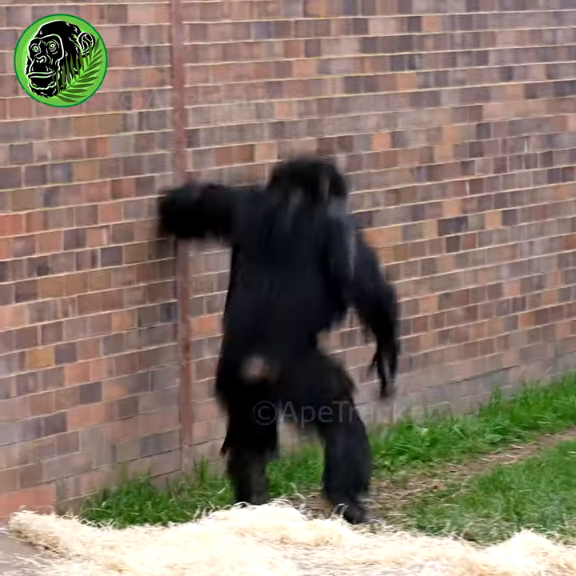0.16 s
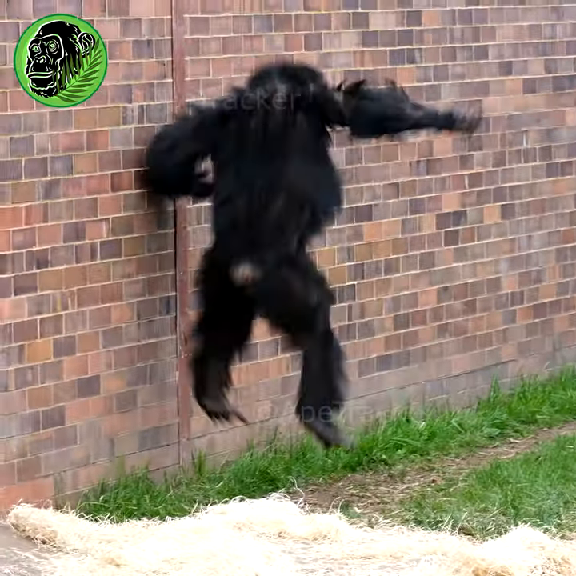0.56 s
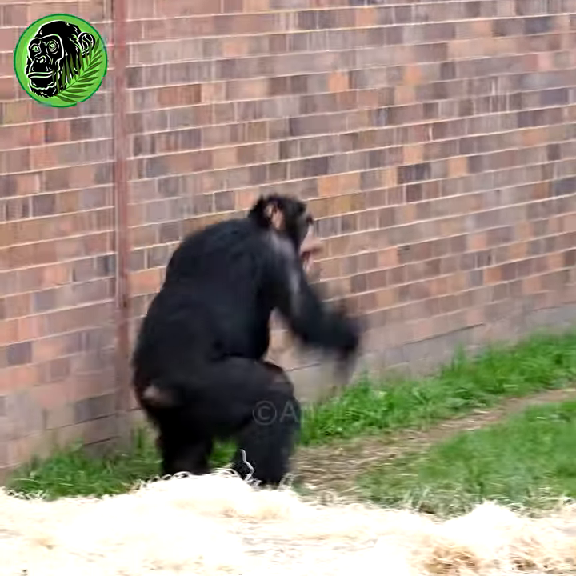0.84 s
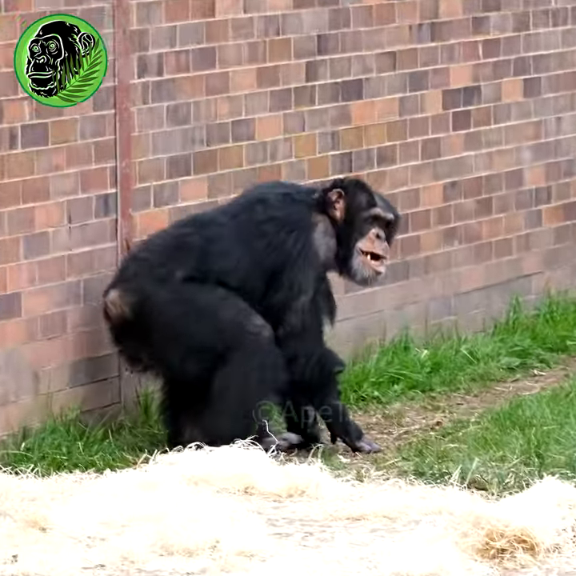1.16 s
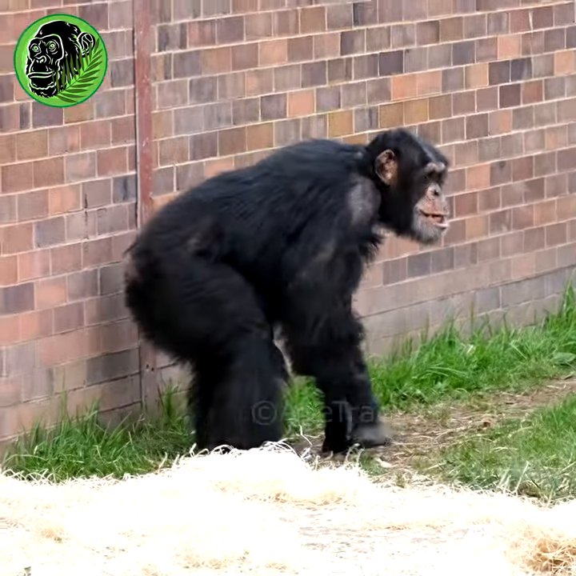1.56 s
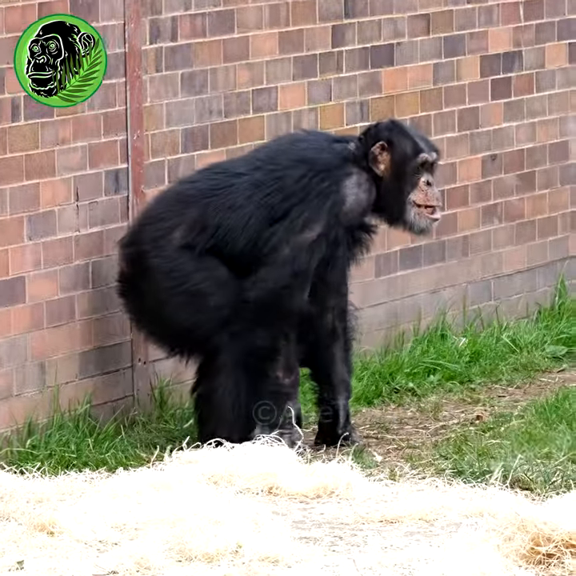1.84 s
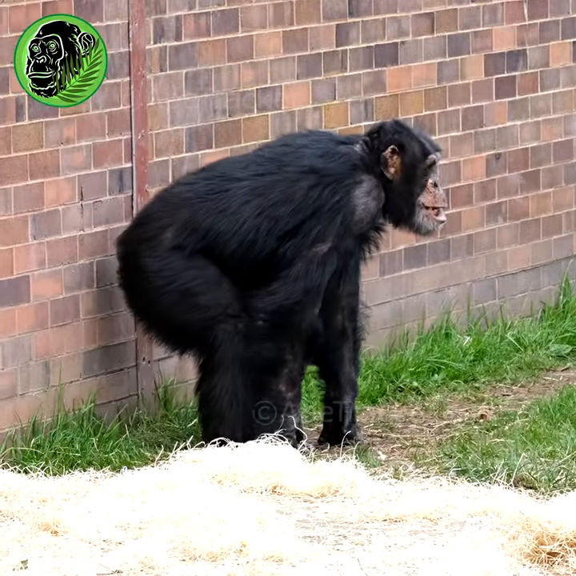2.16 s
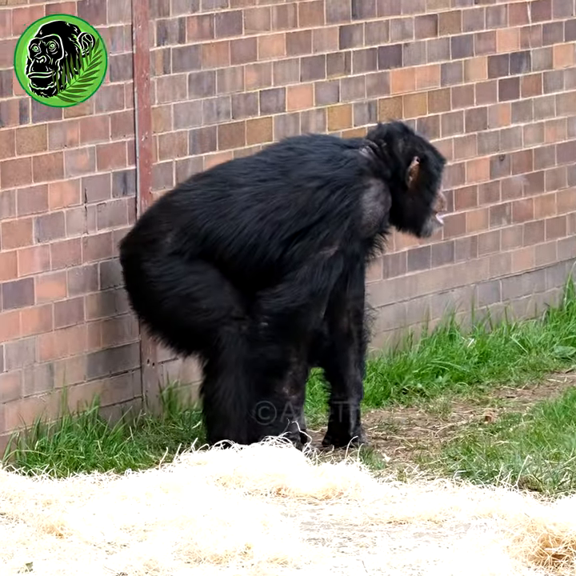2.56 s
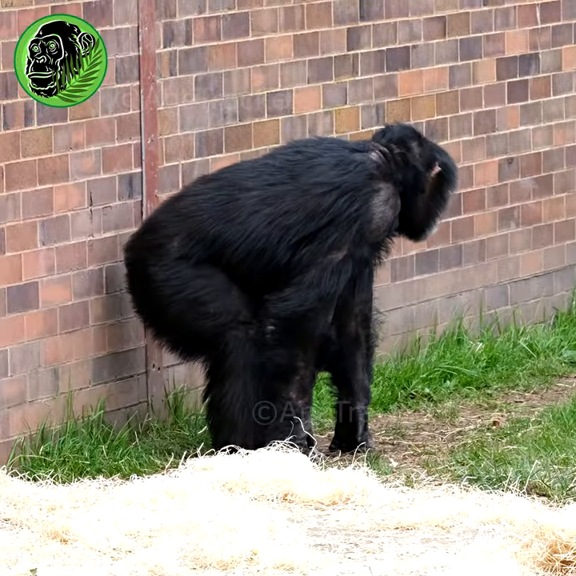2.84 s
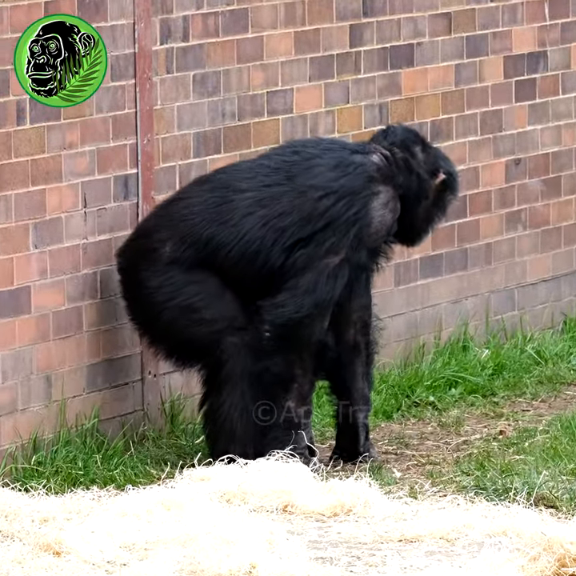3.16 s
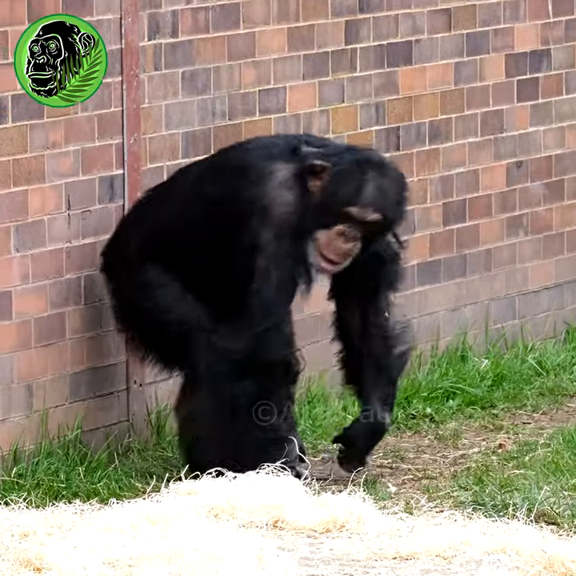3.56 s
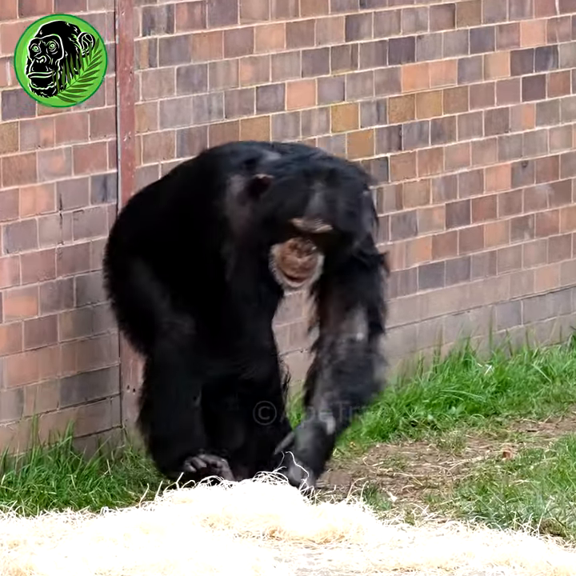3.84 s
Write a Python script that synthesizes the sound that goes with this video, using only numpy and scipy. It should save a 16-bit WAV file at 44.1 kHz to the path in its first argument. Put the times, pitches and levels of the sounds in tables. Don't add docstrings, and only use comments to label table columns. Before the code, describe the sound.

An ape's loud rough scream breaks off at once, short hoots, barks and a yelp follow within a second, then small birds chirp over low traffic rumble in a brick-walled yard, with close camera clicks.

```python
import sys
import numpy as np
from scipy import signal
from scipy.fft import rfft, irfft, next_fast_len
from scipy.io import wavfile
from scipy.ndimage import uniform_filter1d, map_coordinates

SR = 44100
rng = np.random.default_rng(int(sys.argv[2]) if len(sys.argv) > 2 else 0)


def makeup_ratio(level_db):
    decades = np.asarray(level_db, float) / 20
    return 10 ** decades


def dump_mix(stems):
    frames = np.atleast_2d(stems).T
    limited = np.clip(frames, -1, 1)
    pcm = np.round(limited * 32767).astype(np.int16)
    wavfile.write(sys.argv[1], SR, pcm)


N = 176400
T = np.arange(N) / SR


def unit(x):
    return x / np.sqrt(np.mean(x ** 2) + 1e-20)


def along(points, hz):
    point_hz, value = np.transpose(points)
    return np.interp(np.log(hz + 1), np.log(point_hz + 1), value)


def curves(rows):
    time_s, *columns = np.transpose(rows)
    return [np.interp(T, time_s, column) for column in columns]


def wobble(rate_hz):
    return map_coordinates(rng.standard_normal(2000), [T * min(rate_hz, 490)])


def filtered(x, response):
    size = next_fast_len(N + SR // 2)
    hz = np.fft.rfftfreq(size, 1 / SR)
    return irfft(rfft(x, size) * response(hz), size)[..., :N]


def gate(start_s, length_s, attack_s, release_s):
    rise = (T - start_s) / attack_s
    fall = (start_s + length_s - T) / release_s
    return np.clip(np.minimum(rise, fall), 0, 1)


def panned(x, left_over_right_db):
    return x * makeup_ratio([[left_over_right_db / 2], [-left_over_right_db / 2]])


def voice(hz, rough, throat, jitter, shimmer_db, first, count):
    waver = 0.5 * wobble(40.17) + wobble(300)
    phase = 2 * np.pi * np.cumsum(hz * (1 + jitter * rough * waver)) / SR
    tone = np.zeros(N)
    for k in range(first, count):
        level_db = along(throat, k * hz) + shimmer_db * rough * wobble(120)
        tone += makeup_ratio(level_db) * np.cos(k * phase + 2 * np.pi * rng.random())

    def throat_band(f):
        return makeup_ratio(along(throat, f)) * (f > throat[0][0]) * (f < throat[-1][0])

    breath = filtered(rng.standard_normal(N) * (1 + np.cos(phase)), throat_band)
    breath_share = np.clip(rough, 0, 1) ** 2
    return np.sqrt(1 - breath_share) * tone + np.sqrt(breath_share) * unit(breath)


def call(rows, rough, throat, jitter, shimmer_db, count):
    hz, effort_db = curves(rows)[:2]
    on = (T >= rows[0][0]) & (T < rows[-1][0])
    return on * makeup_ratio(effort_db) * voice(hz, rough, throat, jitter, shimmer_db, 1, count)


# start_s, pitch_hz, effort_db, roughness_0_1
SCREAM = [(0, 1143, -16.5, 0.48), (.08, 1146, -17.5, 0.29), (.19, 1168, -18.5, 0.39),
          (.25, 1092, -20.5, 0.34), (.3, 1115, -23, 0.41), (.345, 972.5, -30.5, 0.77),
          (.49, 1047, -35.5, 0.8), (.6, 938, -55, 0.83), (.8, 961, -48, 1.01)]
# start_s, pitch_hz
SECOND_FOLD = [(0, 1070), (.04, 1105), (.08, 1205), (.13, 1215), (.17, 1244), (.21, 1257), (.25, 1197),
               (.29, 1210), (.34, 1005)]
# freq_hz, level_db
SCREAM_THROAT = [(700, -14), (1150, -4), (1600, -22.5), (2150, -6), (2900, -12), (3500, -8), (4900, -10.5),
                 (6400, -28.5)]
SCREAM_JITTER = 0.032
SECOND_FOLD_DB, BREATH_DB = -0.5, -24
BREATH_TOP_HZ, BREATH_SLOPE_DB_PER_OCT = 15000, -10


def scream():
    effort_db, rough = curves(SCREAM)[1:]

    def hiss_band(f):
        slope_db = BREATH_SLOPE_DB_PER_OCT * np.log2(f / 6000 + 0.0091)
        return (f > 5500) * (f < BREATH_TOP_HZ) * makeup_ratio(slope_db)

    hiss = unit(filtered(rng.standard_normal(N), hiss_band))
    hiss = makeup_ratio(BREATH_DB + 2.4 * wobble(31)) * hiss
    second = voice(curves(SECOND_FOLD)[0], rough, SCREAM_THROAT, SCREAM_JITTER, 5.6, 3, count=6)
    extra = makeup_ratio(SECOND_FOLD_DB) * second + hiss
    on = T < SCREAM[-1][0]
    return call(SCREAM, rough, SCREAM_THROAT, SCREAM_JITTER, 9.3, count=6) + on * makeup_ratio(effort_db) * extra


# pitch_multiple, level_db
HOOT_THROAT = [(.4, -15), (.62, -22.5), (1, 3), (1.4, -12), (8, -43.5)]
HOOT_JITTER, HOOT_ATTACK_S, HOOT_RELEASE_S = 0.09, 0.012, 0.007


def short_calls(rows, rough, shimmer_db):
    out = np.zeros(N)
    for start_s, length_s, from_hz, to_hz, level_db in rows:
        hz = np.interp(T, [start_s, start_s + length_s], [from_hz, to_hz])
        mouth = [(multiple * from_hz, gain_db) for multiple, gain_db in HOOT_THROAT]
        sound = voice(hz, rough, mouth, HOOT_JITTER, shimmer_db, 1, count=2)
        out += makeup_ratio(level_db) * gate(start_s, length_s, HOOT_ATTACK_S, HOOT_RELEASE_S) * sound
    return out


# start_s, length_s,
# from_hz, to_hz, level_db
HOOTS = [(-.01, .09, 2110, 2290, -35), (0.153, 0.22, 880, 897, -23.5), (0.338, 0.028, 890, 843, -14),
         (0.364, .039, 880, 786.6, -9.5), (0.414, 0.045, 850, 880, -26), (0.465, 0.034, 900, 906, -14),
         (.493, 0.024, 890, 867, -14.5), (.24, 0.049, 1920, 1680, -26.5), (.54, 0.028, 820, 800, -19.5),
         (0.594, 0.021, 870, 910, -17), (.615, 0.025, 910, 903, -16), (.641, 0.021, 890, 871, -15),
         (.663, 0.028, 870, 855, -28), (0.733, 0.019, 850, 800, -16), (.749, 0.02, 800, 902, -11.5),
         (.905, 0.019, 966, 947, -17.5), (0.973, 0.066, 850, 921, -39)]
BARKS = [
    (.275, 0.081, 1380, 1535, -20),
    (.325, 0.037, 1314, 1225, -24.5),
    (.49, 0.1104, 610, 560, -22.5),
    (.49, 0.029, 4180, 3800, -41),
    (.61, 0.084, 700, 650, -25),
    (.765, 0.049, 851.5, 885, -28.5),
    (.835, 0.031, 750, 833, -23.5),
    (.865, 0.049, 810, 892, -27.5),
]
THUMPS = [
    (-.01, 0.197, 400.4, 368, -41),
    (.4, 0.064, 199.4, 182, -36.5),
    (.68, 0.093, 260, 229, -37),
]


def answers():
    return short_calls(HOOTS, 0.4, 1.5) + short_calls(BARKS, 0.68, 6.1) + short_calls(THUMPS, 1, 3)


# start_s, pitch_hz, effort_db
WHOOP = [(.765, 149.6, -35.5), (.79, 160.3, -28), (.855, 226.8, -26.5), (.92, 294.6, -35.5),
         (.94, 293, -42)]
YELP = [(.78, 478, -30), (.805, 522.4, -29.5), (.845, 563.8, -24), (.89, 556, -26), (.915, 497, -33),
        (.955, 566, -30), (1.0, 557, -34), (1.05, 516, -60)]
# freq_hz, level_db
WHOOP_THROAT = [(100, 24), (170, -1.5), (800, -3), (2500, -41)]
YELP_THROAT = [(450, -10.5), (1100, -3.5), (1700, -9.5), (2600, -26), (3700, -21.5), (15000, -42.5)]


def whoop_and_yelp():
    yelp = call(YELP, 0.36, YELP_THROAT, 0.07, 10.0, count=8)
    return yelp + call(WHOOP, 0.35, WHOOP_THROAT, 0.03, 10.5, count=7)


def whistles(rows, edge_s, flutter_db, waver):
    out = np.zeros(N)
    flutter = makeup_ratio(flutter_db * wobble(150))
    bend = 1 + waver * wobble(90)
    for start_s, length_s, from_hz, to_hz, level_db in rows:
        hz = np.interp(T, [start_s, start_s + length_s], [from_hz, to_hz]) * bend
        phase = 2 * np.pi * np.cumsum(hz) / SR
        out += makeup_ratio(level_db) * gate(start_s, length_s, edge_s, edge_s) * np.sin(phase)
    return out * flutter


# start_s, length_s, from_hz, to_hz, level_db
SONG = [(1.65, 0.047, 7030, 6800, -48.5), (1.738, 0.018, 6900, 7060, -42.5),
        (1.752, 0.018, 7200, 6470, -43), (1.778, 0.02, 6030, 5930, -41.5),
        (1.882, 0.031, 6310, 6110, -45.5), (1.976, 0.022, 7100, 7750, -52), (1.994, 0.018, 7100, 6400, -47),
        (2.011, 0.018, 6460, 4300, -44), (2.12, .016, 5000, 6850, -46), (2.136, 0.028, 6950, 7030, -48),
        (2.135, 0.064, 6010, 5740, -41), (2.262, .016, 4540, 7400, -44.5),
        (2.279, 0.013, 5580, 4930, -41.5), (2.337, 0.012, 5400, 6650, -45.5),
        (2.349, 0.04, 6650, 6700, -50.5), (2.44, 0.022, 5270, 5500, -49), (2.475, 0.019, 5480, 5120, -41.5),
        (2.536, .01, 4970, 6300, -43),
    (2.546, 0.033, 6360, 6500, -52.5),
    (2.637, 0.034, 4875, 5040, -40.5),
    (2.663, 0.016, 5500, 5100, -43),
    (2.852, 0.024, 5130, 5420, -53),
    (1.056, 0.013, 4900, 5750, -50),
    (3.808, 0.03, 3800, 3840, -50.5),
    (3.942, 0.032, 2780, 2050, -46.5),
        (1.335, .014, 5700, 5550, -57), (1.432, 0.021, 6150, 5500, -56),
                (1.632, 0.024, 7750, 7500, -53), (1.766, .012, 6600, 7900, -49),
                (1.776, .02, 8400, 8450, -56), (1.854, .01, 4530, 6100, -57),
                (1.864, .012, 6200, 6250, -57), (1.88, .026, 8800, 8300, -58),
                (2.458, 0.013, 4800, 7000, -46.5), (2.648, 0.016, 5550, 5580, -50),
                (2.556, 0.03, 4250, 4140, -52.5), (3.826, 0.019, 3950, 4150, -54),
                (3.715, 0.023, 3970, 3960, -56), (3.972, .028, 2510, 2120, -47)]


def near_bird():
    return panned(whistles(SONG, 0.003, 1.5, 0.00436), 6.5)


# start_s, length_s, from_hz, to_hz, level_db
FAR_SONG = [(2.095, 0.035, 4000, 4060, -57.5), (2.735, 0.084, 4080, 4400, -57),
            (2.8, 0.081, 4270, 4690, -57.5), (2.86, 0.061, 4230, 3920, -55), (2.93, 0.15, 4150, 4360, -60),
            (2.94, 0.059, 3860, 3550, -62), (2.99, 0.1, 3915, 3740, -61.5), (3.11, 0.077, 3260, 3480, -62),
            (2.58, 0.064, 3230, 3530, -60.5), (3.02, 0.17, 5020, 5050, -66.5), (3.3, .05, 5100, 5050, -72),
            (3.36, .04, 4290, 4070, -64), (3.42, 0.18, 4170, 4030, -73), (3.38, 0.047, 3900, 3750, -68),
            (3.545, 0.047, 2680, 2530, -64.5), (2.67, 0.24, 4970, 4950, -67),
            (3.68, 0.037, 3960, 3600, -58.5), (3.71, 0.074, 3580, 3330, -65.5), (3.7, .05, 2200, 2080, -61),
            (3.77, 0.087, 2285, 2230, -65), (3.92, 0.067, 4190, 4080, -63)]


def far_birds():
    return whistles(FAR_SONG, 0.0088, 5.2, 0.028)


def ring(modes):
    def response(f):
        total = 0
        for k, (center_hz, width_hz, level_db) in enumerate(modes):
            damping = 1j * f * width_hz
            total = total + (-1) ** k * makeup_ratio(level_db) * damping / (center_hz ** 2 - f * f + damping)
        return total
    return response


# start_s, peak_db
SHUTTER = [(0.4454, -36), (0.462, -35), (.558, -41), (0.5678, -45), (0.612, -38), (0.63, -32), (.7255, -42),
           (0.7326, -35), (0.7761, -39), (0.7953, -30), (.808, -40), (2.018, -38), (3.2191, -43),
           (3.4406, -43), (3.919, -41)]
# freq_hz, width_hz, level_db
SHUTTER_MODES = [
    (7500, 900, 7),
    (13900, 2800, 2.5),
]
BURST_END_S, BURST_PAN_DB, LATE_PAN_DB = 1, -3, 3
SNAP_T60_S, RATTLE_T60_S, RATTLE_DB = 0.004, 0.045, -13
KNOCK_S, KNOCK_DB, KNOCK_HZ, KNOCK_WIDTH_HZ = 3.071, -12, 2200, 800


def ticks():
    out = np.zeros((2, N + SR // 20))
    t = np.arange(SR // 20) / SR
    for start_s, peak_db in SHUTTER:
        snap = makeup_ratio(peak_db - 60 * t / SNAP_T60_S)
        rattle = makeup_ratio(peak_db + RATTLE_DB - 60 * t / RATTLE_T60_S)
        pan_db = BURST_PAN_DB if start_s < BURST_END_S else LATE_PAN_DB
        first = round(start_s * SR)
        out[:, first:first + len(t)] += panned((snap + rattle) * rng.standard_normal(len(t)), pan_db)
    knock = np.zeros(N)
    knock[round(KNOCK_S * SR)] = makeup_ratio(KNOCK_DB)
    knock_ring = ring([(KNOCK_HZ, KNOCK_WIDTH_HZ, 0)])
    return filtered(out[:, :N], ring(SHUTTER_MODES)) + filtered(knock, lambda f: knock_ring(f) ** 2)


# time_s, level_db
MOTOR = [(0, -33), (1.6, -32.5), (2.0, -44.5), (4, -45.5)]
MOTOR_HZ, MOTOR_SECOND_DB, MOTOR_FLUTTER_DB = 49, -40, 1


def motor():
    phase = 2 * np.pi * np.cumsum(MOTOR_HZ * (1 + 0.0289 * wobble(8))) / SR
    first = makeup_ratio(curves(MOTOR)[0] + MOTOR_FLUTTER_DB * wobble(12.34)) * np.sin(phase)
    return first + makeup_ratio(MOTOR_SECOND_DB + 1.2 * wobble(17)) * np.sin(2 * phase)


# freq_hz, correlation_0_1
ALIKE = [(60, 1), (400, 0.092), (2400, 0.39), (12000, 0.89)]


def rush(spectrum, patchy_db):
    z = signal.stft(rng.standard_normal((2, N)), nperseg=512)[2]
    field = uniform_filter1d(rng.standard_normal(z.shape[1:]), 6, 0)
    field = uniform_filter1d(field, 14, 1)
    pair = signal.istft(z * makeup_ratio(patchy_db * unit(field)), nperseg=512)[1][:, :N]

    def mid_side(hz):
        angle = np.arccos(np.clip(along(ALIKE, hz), -1, 1)) / 2
        return makeup_ratio(along(spectrum, hz)) * [np.cos(angle), np.sin(angle)]

    mid, side = filtered(pair, mid_side)
    return unit(np.array([mid + side, mid - side]))


# time_s, level_db
TRAFFIC = [(0.0, -35.5), (3.38, -39.5), (4.0, -38)]
# freq_hz, density_db
ROAR = [(16, -17.5), (102, -7), (205, -8), (245, -14.5), (520, -20), (950, -18.5), (3000, -42),
        (6600, -100)]
HISS = [(1470, -22), (2500, -8), (4150, -3.5), (5780, -9), (15700, -15)]
HISS_DB = -57.5


def traffic_and_air():
    level_db = curves(TRAFFIC)[0] + 3.0 + 0.29 * wobble(3.61)
    return makeup_ratio(level_db) * rush(ROAR, patchy_db=0.57) + makeup_ratio(HISS_DB) * rush(HISS, patchy_db=0.7)


# freq_hz, t60_s
YARD = [(1000, 0.54), (5000, 0.48), (12000, 0.81)]
# delay_s, level_db, left_over_right_db
WALLS = [
    (.047, -14.5, -4),
]


def yard(x, wet_db):
    x = x * np.ones((2, 1))
    hz, t, z = signal.stft(rng.standard_normal((2, SR)), SR, nperseg=256)
    decay = makeup_ratio(-60 * t / along(YARD, hz)[:, None])
    tail = signal.istft(z * decay, SR, nperseg=256)[1]
    tail = tail / np.linalg.norm(tail[0])
    slaps = np.zeros((2, N))
    for delay_s, level_db, pan_db in WALLS:
        late = np.pad(x, ((0, 0), (round(delay_s * SR), 0)))[:, :N]
        slaps += panned(makeup_ratio(level_db) * late, pan_db)
    predelayed = np.pad(x, ((0, 0), (600, 0)))
    wet = signal.fftconvolve(predelayed, tail, axes=1)[:, :N]
    return x + slaps + makeup_ratio(wet_db) * wet


def scene():
    apes = yard(scream() + answers() + whoop_and_yelp(), wet_db=-2.5)
    birds = yard(near_bird(), wet_db=-7) + yard(far_birds(), wet_db=10.5)
    return apes + birds + ticks() + motor() + traffic_and_air()


def roll_off(x):
    return signal.sosfilt(signal.butter(12, 15880, fs=SR, output="sos"), x)


# freq_hz, side_gain_db
PORT_WIDTH = [(500, -11.5), (3000, 3), (9000, 6)]
TOP_HZ = 15830


def record(dry):
    mid = (dry[0] + dry[1]) / 2
    side = filtered((dry[0] - dry[1]) / 2, lambda hz: makeup_ratio(along(PORT_WIDTH, hz)))
    mix = filtered(np.array([mid + side, mid - side]), lambda hz: hz < TOP_HZ)
    return roll_off(mix)


dry = scene()
out = record(dry)
dump_mix(out)
```